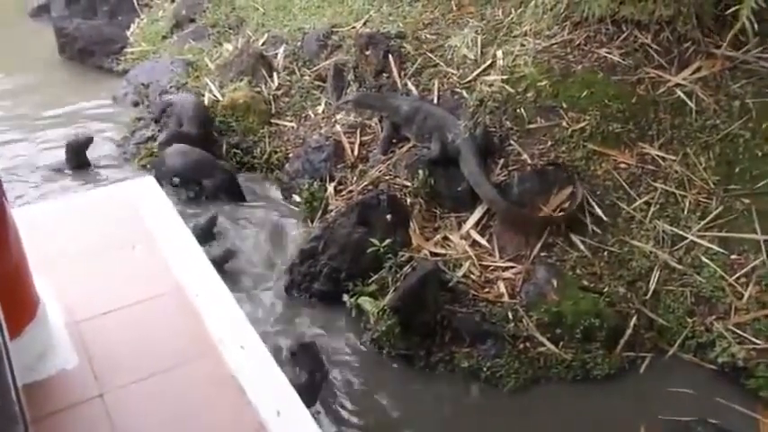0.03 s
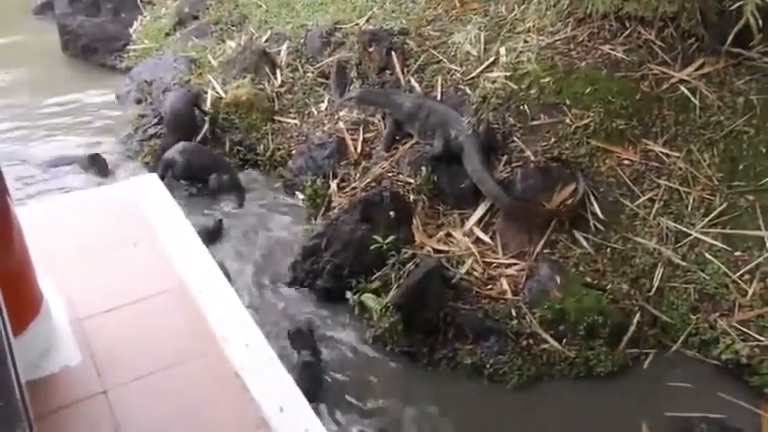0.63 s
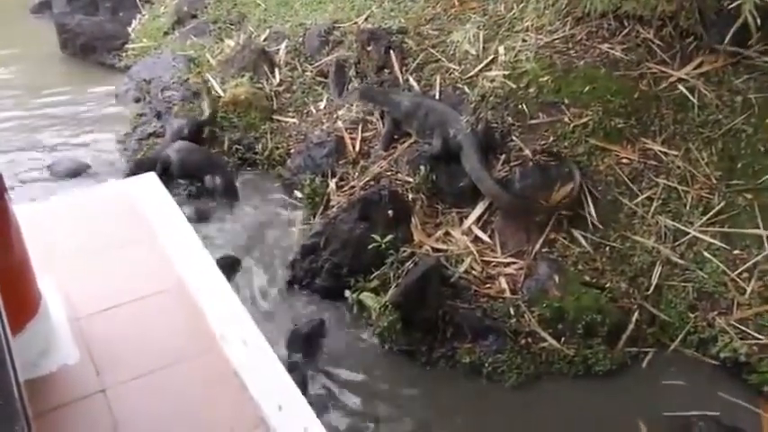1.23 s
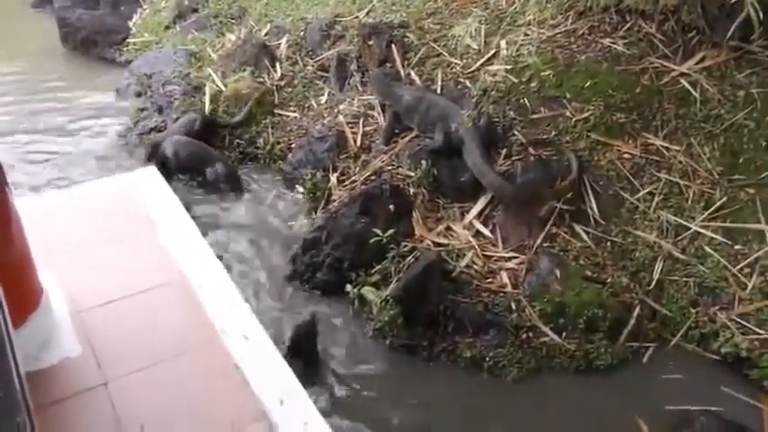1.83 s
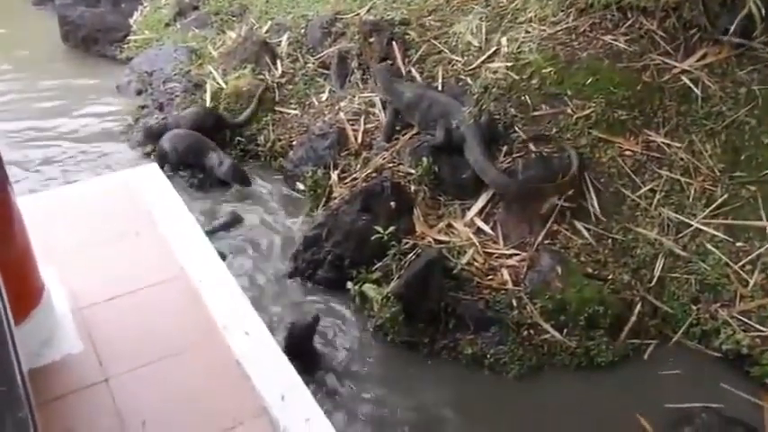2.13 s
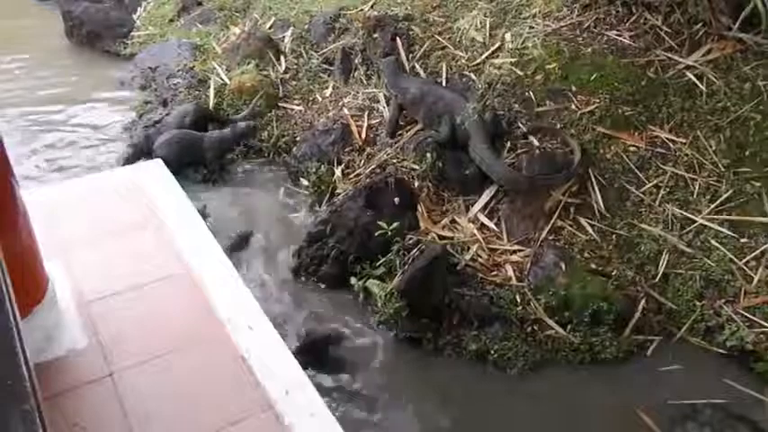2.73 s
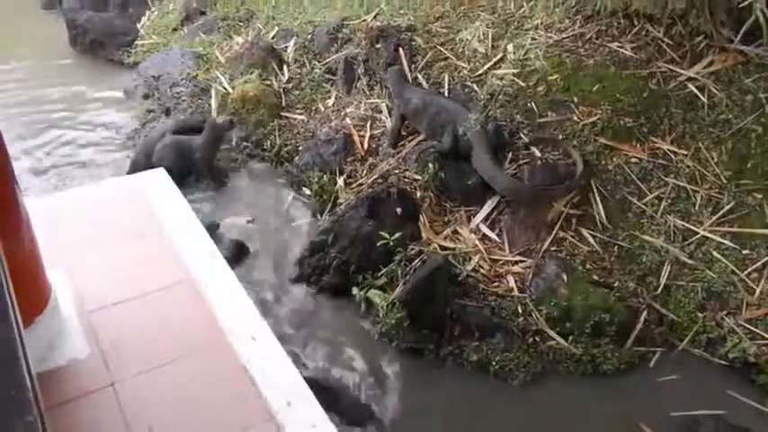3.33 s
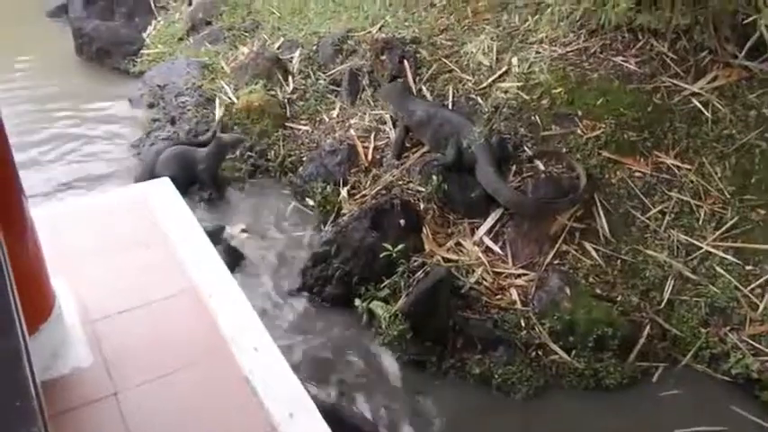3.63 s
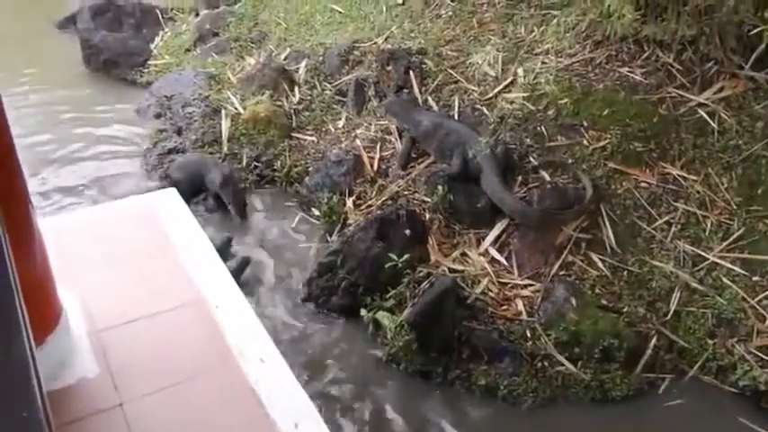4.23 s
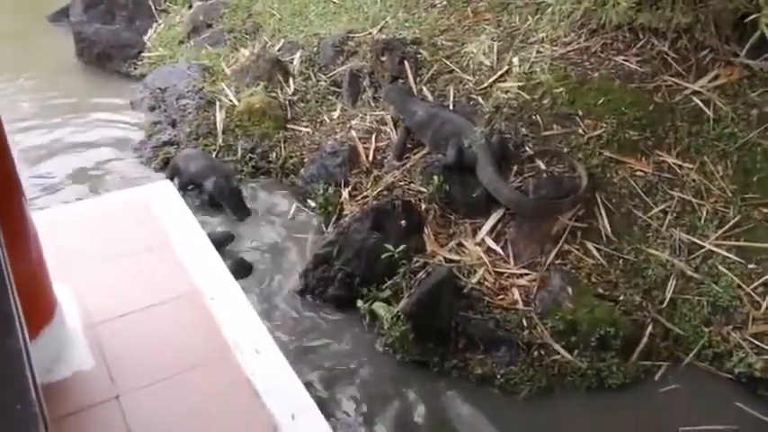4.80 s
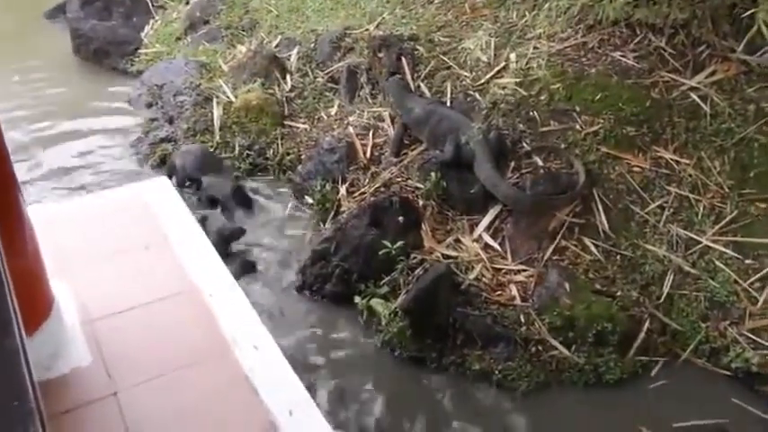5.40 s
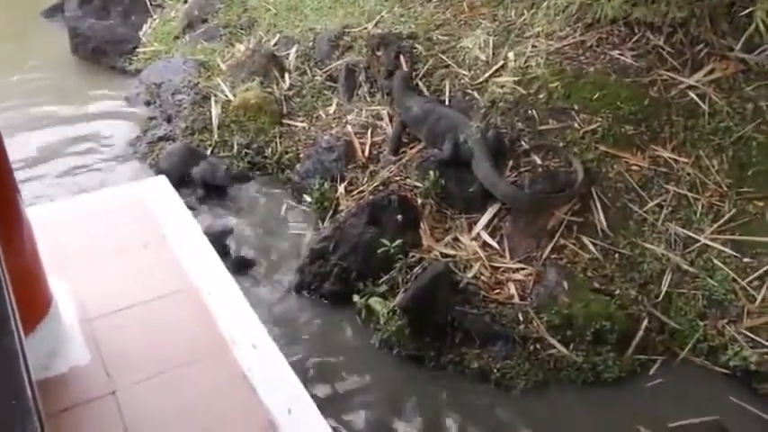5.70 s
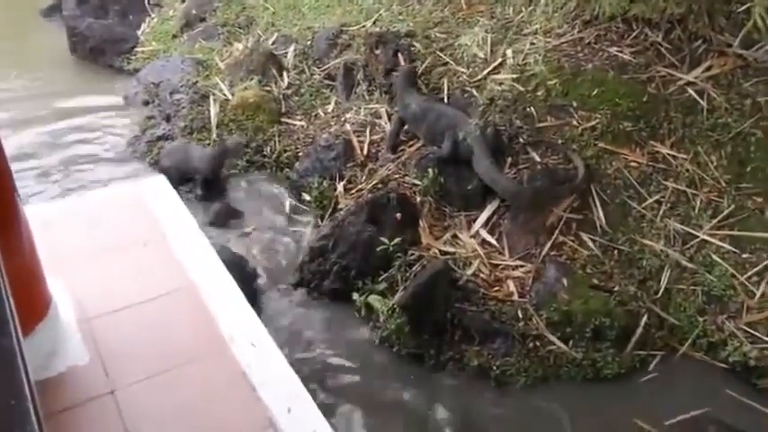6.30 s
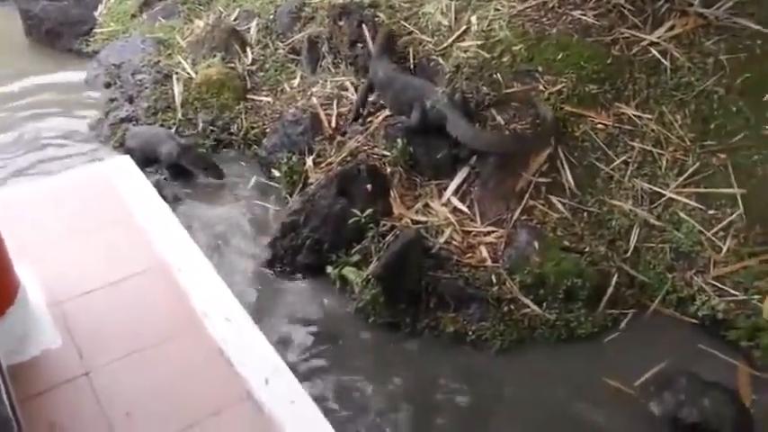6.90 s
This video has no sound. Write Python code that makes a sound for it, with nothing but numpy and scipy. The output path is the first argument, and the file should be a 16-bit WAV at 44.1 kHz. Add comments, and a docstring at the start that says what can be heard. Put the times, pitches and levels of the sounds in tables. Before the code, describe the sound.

Otters give short, shrill, gliding squeals while splashing faintly in a softly running stream outdoors.

```python
"""Otters give shrill, gliding squeals: nearly pure tones that rasp shakes and roughens.
They paddle along a muddy stream bank below a tiled terrace; both throw each squeal back.
Stirred water sloshes, slaps and drips, and trapped air rings as bubbles and plops.
Faint whistles slide in between, something hard clicks nearby, and the stream rushes evenly."""
import sys
import numpy as np
from scipy import signal
from scipy.fft import rfft, irfft
from scipy.io import wavfile

SR = 44100
rng = np.random.default_rng(int(sys.argv[2]) if len(sys.argv) > 2 else 0)


def unload_audio(sound):
    """Save the sound as a 16-bit wav file, at the path given as the first command line argument."""
    columns = np.transpose(np.atleast_2d(sound))
    # keep every value between -1 and 1, then stretch to whole-number steps
    steps = np.round(np.clip(columns, -1, 1) * 32767)
    wavfile.write(sys.argv[1], SR, steps.astype(np.int16))


N = 306495
TIME = np.arange(N) / SR

# Water noise spectra, low to high. Each row: frequency in Hz, relative density in dB.
SLOSH_SPECTRUM = [(200, -9.5), (420, -8), (800, 2.5), (1300, 2), (2200, -22)]
SPLASH_SPECTRUM = [(900, -54), (1500, -1.5), (2500, 2.5), (4200, 2), (6000, -11.5)]
SPRAY_SPECTRUM = [(3200, -19.5), (5000, -3), (6400, 5), (7800, -6.5), (9500, -13.5), (12500, -24),
                  (15500, -28)]


def from_db(db):
    """Decibels to gain."""
    return 10 ** (np.asarray(db) / 20)


def unit_rms(x):
    """Scale to rms 1."""
    return x / np.sqrt(np.mean(x ** 2) + 1e-20)


def curve(points):
    """Interpolate (time in s, value) points at every sample."""
    return np.interp(TIME, *np.transpose(points))


def swells(rows):
    """Sum of bell curves."""
    return sum(height * np.exp(-0.5 * ((TIME - at_s) / width_s) ** 2) for at_s, height, width_s in rows)


def drift(rate_hz):
    """Random wander between knots of spread 1."""
    knots = rng.standard_normal(N // 8)
    return np.interp(TIME * rate_hz * 2, np.arange(len(knots)), knots)


def add(out, start_s, sound):
    """Mix a short sound in at start_s."""
    start = int(np.clip(start_s * SR, 0, N - 1))
    out[start:start + len(sound)] += sound[:N - start]


def coloured(x, spectrum):
    """Give a flat sound a spectrum; rms 1."""
    hz, db = np.transpose(spectrum)
    log_hz = np.log(np.arange(N // 2 + 1) * SR / N + 1)
    gain = from_db(np.interp(log_hz, np.log(hz), db, left=-60, right=-60))
    return unit_rms(irfft(rfft(x) * gain, N))


def stream(level_db):
    """Even rush of running water."""
    # Each row: frequency in Hz, relative density in dB.
    spectrum = [(18, -52), (30, -13.5), (92, -1), (341, -4), (432, 2), (561, -2), (787, 2), (945, -4.5),
                (1260, -5.5), (2910, -11), (3230, -13.5), (5170, -16.5), (6370, -25.5), (8280, -12.5),
                (15500, -25)]
    return from_db(level_db) * coloured(rng.standard_normal(N), spectrum)


def stirring(rise_db_per_s, settle_db_per_s):
    """Relative slosh, splash and spray levels in dB: strokes swell, hold and settle over ripples."""
    # Constant rippling. Each row: time in seconds, level in dB.
    ripples = [(0, -62.5), (1.4, -60.5), (2.6, -58.5), (3.3, -61.5), (3.8, -65.5), (4.7, -65.5),
               (5.3, -62.5), (6.1, -58.5), (6.95, -58.5)]
    # Strokes and dives. Each row: start and hold in seconds, splash in dB, slosh and spray in dB re splash.
    strokes = [(0.792, 0.01, -56.5, 7.5, 10), (1.004, 0.034, -66, 15, 15), (2.033, 0.32, -53.5, -18, 1.5),
               (2.445, .06, -52.5, -7, -8), (2.483, 0.1, -51.5, -4.5, 1.5), (2.552, 0.023, -62.5, 5, 17),
               (2.827, .06, -64.5, -11, 12), (2.905, 0.21, -53, -9, 2), (4.2, 0.11, -57, -6, 2),
               (5.322, 0.057, -68.5, -9, 19.5), (5.41, 0.25, -57.5, 0, 11.5), (5.707, 0.013, -51, -3, 3.5),
               (5.782, 0.04, -55.5, -4, 10.5), (6.194, 0.023, -57.5, 7.5, 10.5),
               (6.295, 0.057, -62.5, 0, 10), (6.494, 0.042, -46.5, 0, 3.5), (6.58, 0.11, -47.5, 2, 6),
               (6.77, 0.049, -53, 1, 0), (6.913, 0.013, -41, -8, 0)]
    power = from_db(curve(ripples) + np.array([[0], [0], [6.5]])) ** 2  # ripples favour spray
    for start_s, hold_s, splash_db, slosh_db, spray_db in strokes:
        fade_db = np.maximum(rise_db_per_s * (start_s - TIME), settle_db_per_s * (TIME - start_s - hold_s))
        heard = fade_db < 40
        stroke_db = splash_db - np.maximum(fade_db[heard], 0)
        power[:, heard] += from_db(stroke_db + np.array([[slosh_db], [0], [spray_db]])) ** 2
    return 10 * np.log10(power)


def droplets(spectrum, per_s, spread_db, hiss):
    """Tiny impacts of uneven size over a smooth hiss; rms 1."""
    sizes = from_db(spread_db * np.minimum(rng.exponential(1, N), 4)) * rng.choice([-1, 1], N)
    impacts = unit_rms(sizes * (rng.random(N) < per_s / SR))
    return coloured(impacts + hiss * rng.standard_normal(N), spectrum)


def hollows(x, low_hz, high_hz, bands, swing_db, rate_hz):
    """Hollows open and close in stirred water, so narrow bands swell by turns; rms 1."""
    out, spectrum = 0, rfft(x)
    log_hz = np.log(np.arange(len(spectrum)) * SR / N + 1)
    place = np.interp(log_hz, np.log([low_hz, high_hz]), [0, bands - 1])
    for k in range(bands):
        band = irfft(spectrum * np.maximum(1 - abs(place - k), 0), N)
        out = out + band * from_db(swing_db * np.minimum(drift(rate_hz), 2))
    return unit_rms(out)


def bubble(hz, t60_s, rise):
    """A dying sine whose pitch climbs as the bubble nears the surface."""
    t = np.arange(int(t60_s * SR) + 2) / SR
    phase = 2 * np.pi * hz * t * (1 + rise * t / t60_s / 2)
    return np.sin(phase) * from_db(-60 * t / t60_s) * (1 - np.exp(-t * hz))


def gurgle(level_db, low_hz, high_hz, count, rise, cycles, range_db):
    """Bubbles of random size, as loud as the water is stirred."""
    out = np.zeros(N)
    for when, pitch, weakness in rng.random((count, 3)):
        hz = low_hz * (high_hz / low_hz) ** pitch
        gain = from_db(level_db[int(when * N)] - range_db * weakness)
        add(out, when * N / SR, gain * bubble(hz, cycles / hz, rise))
    return out


def paddling():
    """Swimming bodies push slosh, breaking ripples and spray; each traps bubbles of its own size."""
    slosh_db, splash_db, spray_db = stirring(rise_db_per_s=507, settle_db_per_s=189)
    slosh = from_db(slosh_db - 4 + 4.5 * drift(18))
    slosh *= droplets(SLOSH_SPECTRUM, per_s=400, spread_db=3, hiss=0.83)
    breaking = droplets(SPLASH_SPECTRUM, per_s=900, spread_db=3.5, hiss=1)
    splash = from_db(splash_db - 1)
    splash *= hollows(breaking, low_hz=1110, high_hz=6100, bands=12, swing_db=5.5, rate_hz=25)
    spray = from_db(spray_db - 1 + 2.67 * drift(30))
    spray *= droplets(SPRAY_SPECTRUM, per_s=1600, spread_db=2, hiss=0.89)
    large = gurgle(slosh_db + 9.5, low_hz=565, high_hz=1570, count=300, rise=0.12, cycles=88, range_db=20)
    small = gurgle(splash_db + 6.5, low_hz=1309, high_hz=4633, count=1000,
                   rise=0.218, cycles=112, range_db=8)
    fizz = gurgle(spray_db + 12.5, low_hz=4050, high_hz=7830, count=520,
                  rise=0.24, cycles=58, range_db=30)
    return slosh + splash + spray + large + small + fizz


def whistles(waver, hoarse, flicker_db):
    """Faint sliding notes and one low bloop; the wider the slide, the hoarser the note."""
    # Each row: start and length in seconds, first and last pitch in Hz, level in dB.
    notes = [(0.13, 0.053, 2540, 2240, -60), (0.644, 0.11, 2750, 2990, -61),
             (1.347, 0.094, 1960, 1950, -54), (1.652, 0.085, 2794, 2790, -53),
             (2.249, 0.09, 4120, 1600, -52), (2.647, 0.076, 3820, 2440, -54), (2.8, .042, 624, 1105, -51),
             (2.868, 0.11, 3280, 2000, -55), (2.959, 0.087, 3970, 1850, -56),
             (3.477, 0.11, 2440, 2255, -58.5), (3.54, 0.18, 3880, 5030, -63)]
    out, wander = np.zeros(N), drift(250)
    for start_s, length_s, first_hz, last_hz, level_db in notes:
        hz = np.geomspace(first_hz, last_hz, int(length_s * SR))
        depth = waver + hoarse * abs(np.log(first_hz / last_hz))
        hz *= 1 + depth * wander[int(start_s * SR):][:len(hz)]
        envelope = from_db(level_db) * np.sqrt(2 * np.sqrt(np.hanning(len(hz))))
        add(out, start_s, envelope * np.sin(2 * np.pi * np.cumsum(hz) / SR))
    return out * from_db(flicker_db * drift(70))


def slaps(hold_s):
    """Paws and tails slap the water: a burst of drops over the gulp of the hollow left behind."""
    # Each row: start in seconds, relative level in dB, 40 dB decay in seconds,
    # gulp and spray in dB re splash.
    hits = [(0.183, -45, 0.054, -30, 8), (0.713, -50.5, 0.062, -1.5, -2), (0.976, -44, 0.049, 0.5, 2),
            (2.91, -50.5, 0.024, -4.5, 3), (3.093, -46, 0.043, -11, 2.5), (3.187, -60.5, 0.076, -13, 15),
            (3.218, -60, .05, -8, 13), (3.38, -48, 0.057, -1, 7), (5.137, -62.5, 0.34, -19, 9.5),
            (5.401, -62.5, 0.11, 0, 16.5), (6.572, -45, 0.028, -3.5, -3), (6.646, -43, 0.027, -5.5, 4)]
    gulp = droplets(SLOSH_SPECTRUM, per_s=980, spread_db=2, hiss=0.81)
    splash = droplets(SPLASH_SPECTRUM, per_s=1300, spread_db=-8.5, hiss=1)
    spray = droplets(SPRAY_SPECTRUM, per_s=1100, spread_db=1, hiss=0.54)
    out = np.zeros(N)
    for start_s, level_db, decay_s, gulp_db, spray_db in hits:
        span = slice(int(start_s * SR), int((start_s + hold_s + decay_s) * SR))
        fade = from_db(level_db + 1 - 40 * np.maximum(TIME[span] - start_s - hold_s, 0) / decay_s)
        out[span] += fade * (splash[span] + from_db(gulp_db) * gulp[span] + from_db(spray_db) * spray[span])
    return out


def drips(t60_s, width):
    """Each heavy drop lands with one tick, a band of noise round its own pitch."""
    # Each row: start in seconds, peak in dB, pitch in Hz.
    drops = [(.279, -36, 5900), (2.911, -26.5, 5630), (3.216, -30, 7660), (3.382, -28.5, 3630),
             (4.265, -32.5, 5230), (4.404, -33, 7550), (5.763, -39, 7200), (6.574, -23, 5830)]
    out, t = np.zeros(N), TIME[:SR // 10]
    for start_s, peak_db, hz in drops:
        band = signal.butter(2, [hz / (1 + width), hz * (1 + width)], "band", fs=SR, output="sos")
        tick = signal.sosfilt(band, rng.standard_normal(len(t)) * from_db(-60 * t / t60_s))
        add(out, start_s, from_db(peak_db) * tick / np.max(abs(tick)))
    return out


def voice(hz, rasp, push_db, bright_db, jitter=0.0393, waver=0.0154, register_hz=6580):
    """A nearly pure tone; rasp shakes its pitch and level and brings out a smeared octave."""
    # Octave strength. Each row: fundamental in Hz, relative level in dB.
    octave_curve = [(850, -5), (1080, 10.5), (1400, -15), (3600, 4), (4600, -4.5), (5700, -7), (6400, -14),
                    (7100, -12), (7600, -38)]
    shaken_hz = hz * (1 + rasp * (jitter * drift(900) + waver * drift(120)))
    phase = 2 * np.pi * np.cumsum(shaken_hz) / SR
    octave_db = np.interp(hz, *np.transpose(octave_curve)) + bright_db + 13.5 * (rasp - 1)
    octave_db -= 0.45 * push_db  # a push feeds mostly the fundamental
    octave_db += 2.5 * drift(200)
    octave = from_db(octave_db) * np.sin(2 * phase + 1.2 * np.sqrt(rasp) * drift(700))
    # Below the shrill register, rasp makes alternate cycles unequal: a line at 1.5 times the pitch.
    low_register = np.clip(10 * (1 - hz / register_hz), 0, 1)
    fifth = from_db(bright_db - 5) * rasp ** 3 * low_register * np.sin(1.5 * phase)
    flutter = 1 + rasp * drift(600)
    return np.sqrt(2) * flutter * (np.sin(phase) + octave + fifth)


def squeals(attack_db, sag_db_per_s, release_db, rasp_loss_db):
    """Otter calls rise, sag and fade; pushes make them louder and clearer, breaks hoarser."""
    # Each row: level in dB, attack and release in seconds, overtone offset in dB, rasp 0-1.
    calls = [(-22, 0.034, 0.034, 1, 0.39), (-33.5, 0.01, 0.046, -4, 0.16), (-41, 0.013, 0.017, -20, 0.9),
             (-37.5, 0.07, 0.072, 3, 0.32), (-42.5, 0.0044, 0.064, -35, 1.0),
             (-22, 0.012, 0.054, -0.5, 0.37), (-24, 0.021, 0.0034, 2.5, 0.18)]
    # One pitch path per call, mostly arches and falls. Each point: time in seconds, pitch in Hz.
    glides = [
        [(.710, 3400), (.720, 5800), (.731, 6720), (.752, 7330), (.778, 7260), (.802, 6930), (.822, 6130),
         (.850, 5240)],
        [(1.068, 6330), (1.085, 6400), (1.116, 6100), (1.127, 5450), (1.170, 4950), (1.176, 4320),
         (1.208, 3650), (1.225, 2900)],
        [(1.185, 7530), (1.222, 7060), (1.290, 6030)],
        [(1.225, 1375), (1.245, 1298), (1.265, 1069), (1.290, 1064), (1.297, 823), (1.314, 640)],
        [(1.510, 5480), (1.535, 5820), (1.625, 6200)],
        [(1.965, 3300), (1.977, 5970), (1.990, 6720), (2.035, 7660), (2.090, 7200), (2.110, 6340),
         (2.145, 5860), (2.2, 5460)],
        [(4.700, 8100), (4.718, 7970), (4.730, 7140), (4.760, 7000), (4.825, 6310), (4.872, 5340),
         (4.877, 4540), (4.888, 4300)],
    ]
    # Each row: time in seconds, boost in dB, width in seconds.
    pushes = [(.757, 8, 0.0055), (1.093, 6.5, 0.015), (1.297, 12, 0.0056), (1.996, 10.5, 0.0094),
              (4.733, 7, 0.0058), (4.783, 9.5, 0.0087)]
    # Each row: time in seconds, added rasp 0-1, width in seconds.
    breaks = [(.81, 0.17, 0.02), (1.13, 0.57, 0.012), (1.19, 0.82, 0.016), (2.055, 0.73, 0.027),
              (4.745, 0.33, 0.022)]
    out, push_db, break_rasp = np.zeros(N), swells(pushes), swells(breaks)
    for (level_db, attack_s, release_s, bright_db, own_rasp), glide in zip(calls, glides):
        since_s, left_s = TIME - glide[0][0], glide[-1][0] - TIME
        envelope_db = (level_db - attack_db * np.clip(1 - since_s / attack_s, 0, 1)
                       - sag_db_per_s * np.clip(since_s - attack_s, 0, 1)
                       - release_db * np.clip(1 - left_s / release_s, 0, 1))
        rasp = np.minimum(own_rasp + break_rasp, 1) * np.exp(-0.2 * push_db)
        gate = np.clip(np.minimum(since_s, left_s) / 0.0011, 0, 1)
        gain = gate * from_db(envelope_db + push_db - rasp_loss_db * rasp)
        out += gain * voice(curve(glide), rasp, push_db, bright_db)
    return out


def plops(rise):
    """Further bubbles, each placed with its own time, pitch and level, close and ring."""
    # Each row: start in seconds, pitch in Hz, level in dB, T60 in seconds.
    pockets = [(.977, 900, -35, 0.077), (1.072, 875, -41, 0.11), (2.138, 2580, -38, .03),
               (2.177, 1800, -42, .05), (2.532, 1376, -36.5, 0.053), (2.56, 860, -39, 0.081),
               (4.321, 2280, -38, 0.021), (4.329, 1140, -43.5, 0.15), (4.405, 5670, -36, 0.055),
               (4.996, 734, -29.5, 0.031), (5.01, 1267, -42.5, 0.07), (5.123, 448, -46, 0.16),
               (5.248, 1305, -43.5, .07), (5.643, 2200, -36.5, 0.031), (5.708, 1520, -42, .06),
               (5.795, 782, -39, 0.11), (5.806, 2010, -42, 0.05), (6.132, 1565, -41, 0.091),
               (6.512, 462, -38, 0.091), (6.535, 1045, -38.5, 0.11), (6.895, 2300, -21, 0.012),
               (6.904, 2500, -25, 0.017)]
    out = np.zeros(N)
    for start_s, hz, level_db, t60_s in pockets:
        add(out, start_s, from_db(level_db) * bubble(hz, t60_s, rise))
    return out


def mist():
    """The finest flung drops land in short, bright flurries."""
    # Each row: time in seconds, level in dB, width in seconds.
    flurries = [(4.41, -57, 0.007), (5.339, -56, 0.019), (5.43, -52, 0.043), (5.595, -52, 0.02),
                (6.2, -48.5, 0.015)]
    # Each row: frequency in Hz, relative density in dB.
    spectrum = [(5000, -3), (8500, 2), (11000, -5), (15500, -12)]
    envelope = swells([(at_s, from_db(level_db), width_s) for at_s, level_db, width_s in flurries])
    return envelope * droplets(spectrum, per_s=2000, spread_db=2, hiss=0.5)


def clicks(rise_s, contact_s, snap_db, band_hz):
    """A small hard thing is knocked: it snaps and rings up during contact, then dies fast."""
    # Each row: start in seconds, level in dB.
    knocks = [(4.808, -42), (5.014, -44.5), (5.2213, -18.5), (5.2442, -33)]
    # Each row: frequency in Hz, level in dB re the knock, T60 in seconds.
    modes = [(1343, -18, 0.018), (2344, -11.5, 0.011), (2880, -2.5, 0.011)]
    out, t = np.zeros(N), TIME[:SR // 10]
    band = signal.butter(2, band_hz, "band", fs=SR, output="sos")
    contact = np.sin(np.pi * np.minimum(t / contact_s, 1))
    onset = np.minimum(t / rise_s, 1) ** 2
    for start_s, level_db in knocks:
        snap = contact * unit_rms(signal.sosfilt(band, rng.standard_normal(len(t))))
        add(out, start_s, from_db(level_db + snap_db) * snap)
        for hz, mode_db, t60_s in modes:
            decay = from_db(level_db + mode_db - 60 * np.maximum(t - contact_s, 0) / t60_s)
            add(out, start_s, onset * decay * np.sin(2 * np.pi * hz * t))
    return out


def bank(x, tail_db, t60_s, build_s):
    """Direct sound, sharp echoes off the terrace, and scatter from rocks, walls and plants."""
    # Each row: delay in seconds, level in dB re the direct sound.
    echoes = [(.0046, -22), (0.0109, -16.5), (0.0185, -18)]
    t = TIME[:SR]
    scatter = rng.standard_normal(SR) * from_db(-60 * t / t60_s) * np.clip(t / build_s, 0, 1)
    response = from_db(tail_db) * scatter / np.sqrt(np.sum(scatter ** 2))
    for delay_s, level_db in [(0.00065, 0)] + echoes:
        add(response, delay_s, from_db([level_db]))
    return signal.fftconvolve(x, response)[:N] / np.sqrt(np.sum(response ** 2))


def scene():
    """Voices and water in the open, over the stream; mono."""
    otters = squeals(attack_db=21.5, sag_db_per_s=44.5, release_db=18, rasp_loss_db=3)
    mix = bank(otters, tail_db=-3.5, t60_s=0.32, build_s=0.0039)
    faint_notes = whistles(waver=0.015, hoarse=0.026, flicker_db=2.5)
    mix += bank(faint_notes, tail_db=-10.5, t60_s=0.37, build_s=0.014)
    water = paddling() + slaps(hold_s=0.011) + plops(rise=0.135) + mist()
    mix += bank(water, tail_db=-10, t60_s=0.46, build_s=0.0038)
    mix += bank(drips(t60_s=0.014, width=0.16), tail_db=-3, t60_s=0.22, build_s=0.0071)
    mix += stream(level_db=-57.5)
    mix += clicks(rise_s=0.0018, contact_s=0.0035, snap_db=-14, band_hz=(3800, 8400))
    return mix[None]


def record(dry):
    """Steep low-pass at 15.8 kHz."""
    return signal.sosfilt(signal.ellip(12, 0.1, 80, 15800, fs=SR, output="sos"), dry)


dry = scene()
out = record(dry)
unload_audio(out)
```